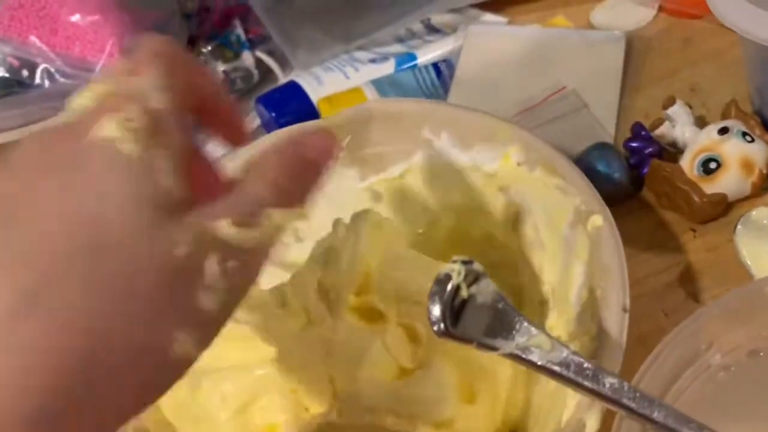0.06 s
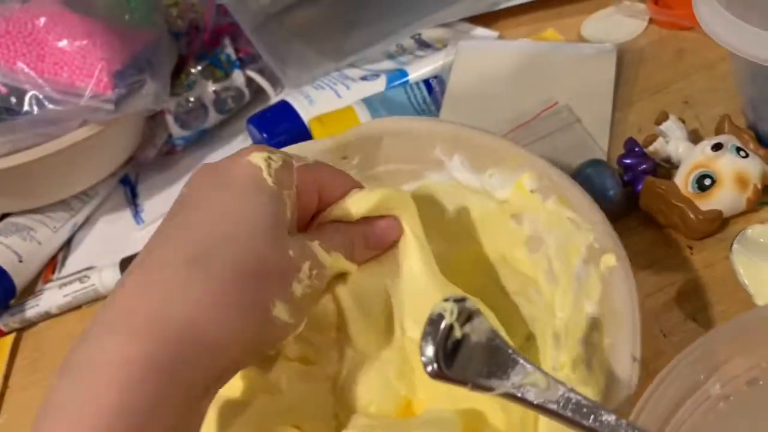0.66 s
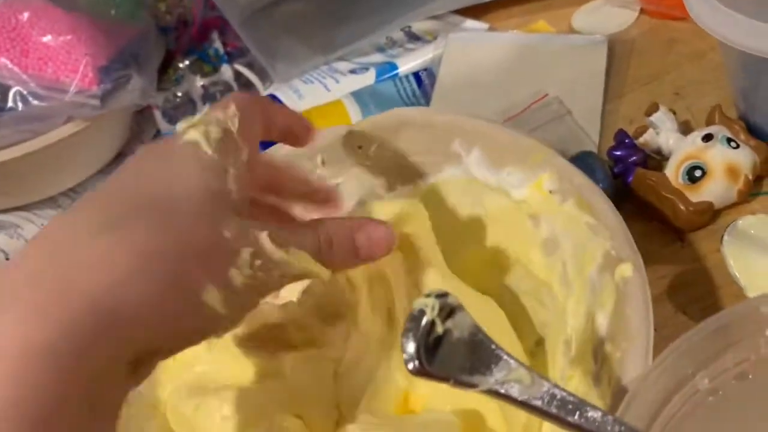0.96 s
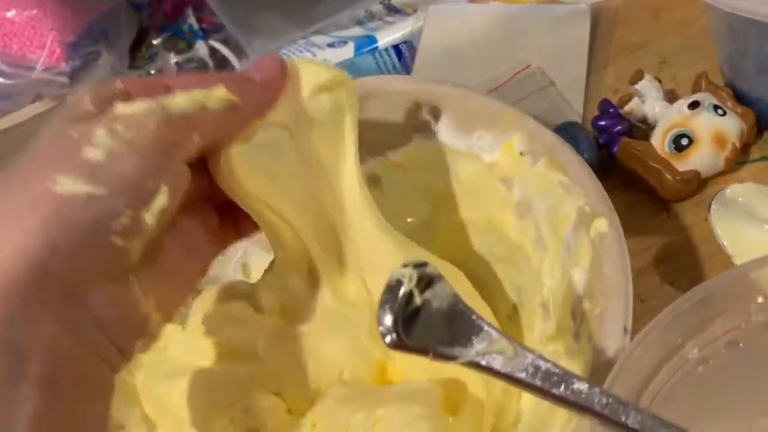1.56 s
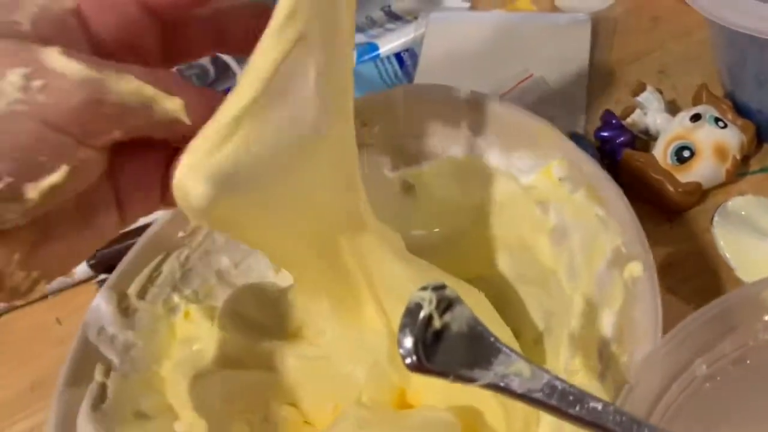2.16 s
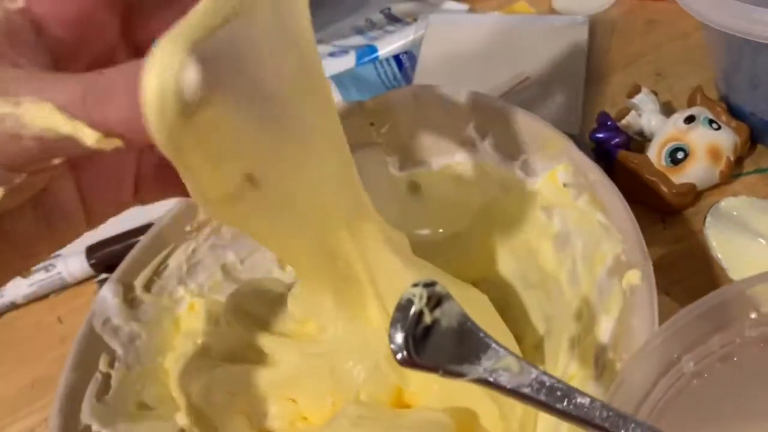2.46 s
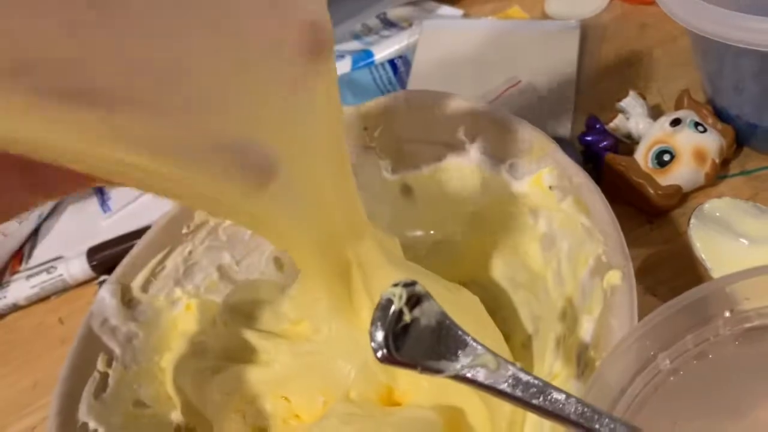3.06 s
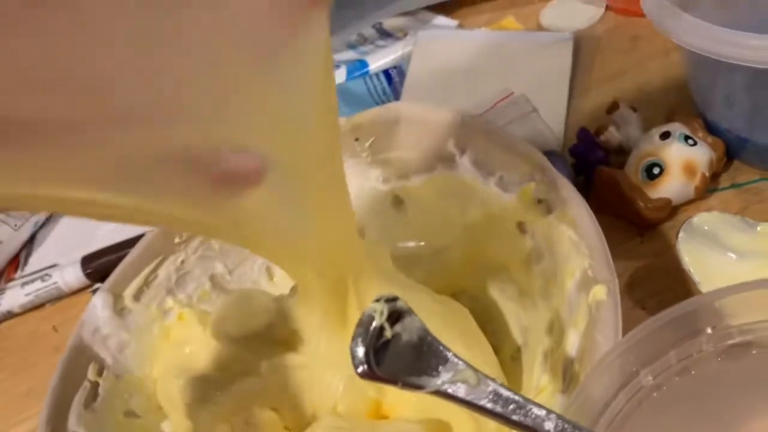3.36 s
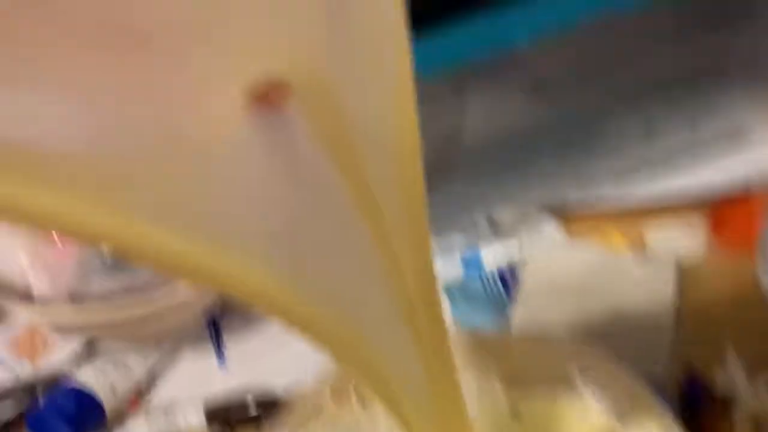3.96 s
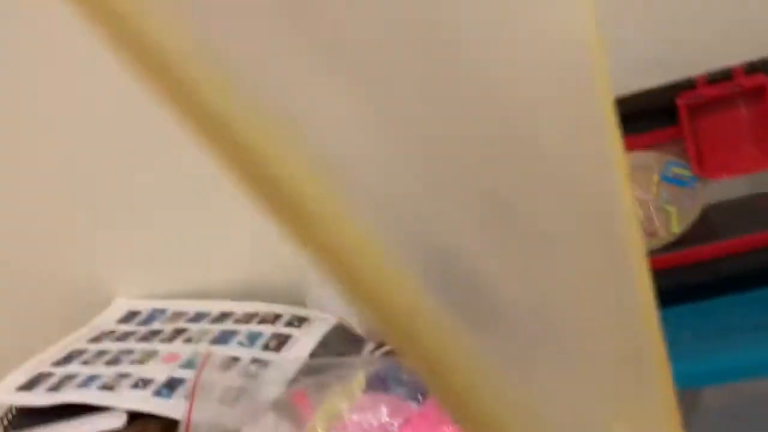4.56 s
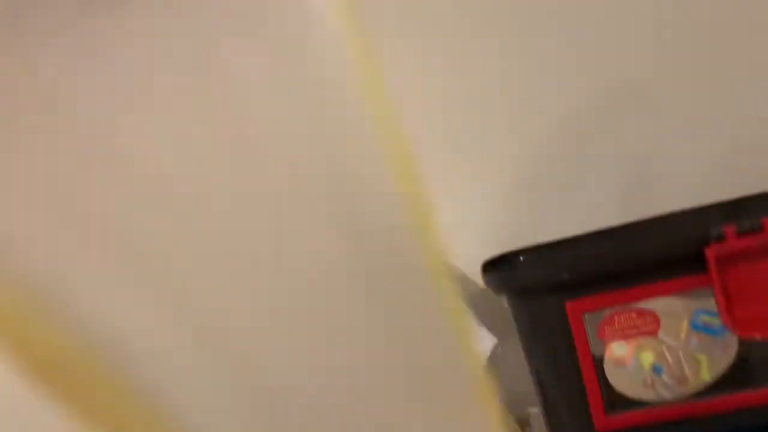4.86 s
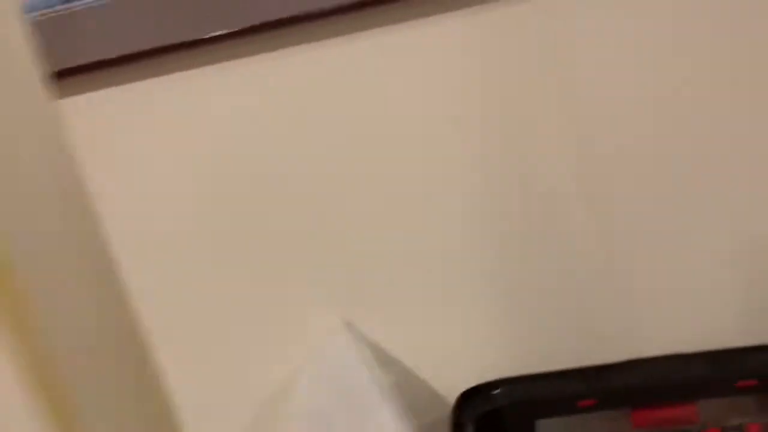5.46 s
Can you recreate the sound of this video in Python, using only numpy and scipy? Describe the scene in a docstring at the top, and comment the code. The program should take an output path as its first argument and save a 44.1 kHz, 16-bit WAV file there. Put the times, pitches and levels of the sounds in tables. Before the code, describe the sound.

Soft, squelchy rubbing and fine crackle sound up close as fingers work fluffy slime in a bowl. After a dull handling thump, sticky threads click apart and air pockets burst in a run of small wet pops. Pulled into a sheet, the slime grows quieter and gives two little snaps. More low microphone bumps follow, then a last brief crackling slide. The room is small and still.

```python
"""Soft, squelchy rubbing, very close: a hand kneads fluffy slime in a plastic bowl.
The foam fizzes against the skin, sticky threads part with dry clicks, folds squeeze out tiny whistles
and trapped air pockets burst in wet pops. Pulled up into a thin, taut sheet, the slime snaps twice.
Dull bumps and rumble come through the body of a hand-held camera; the room is small and quiet."""
import sys
import numpy as np
from scipy import signal
from scipy.fft import rfft, irfft, next_fast_len
from scipy.io import wavfile
from scipy.ndimage import uniform_filter1d, map_coordinates

SR = 44100
rng = np.random.default_rng(int(sys.argv[2]) if len(sys.argv) > 2 else 0)


def int16_out(signal):
    """Quantize to a 16-bit WAV file."""
    q = np.round(np.clip(np.atleast_2d(signal).T, -1, 1) * 32767)
    wavfile.write(sys.argv[1], SR, q.astype(np.int16))


N = 246959

# stereo image: (frequency [Hz], left-right likeness [0-1])
STEREO_LIKENESS = [(60, 0.94), (290, 0.89), (640, 0.44), (1400, 0.24), (3000, 0), (15000, 0)]
# tone of the still air: (frequency [Hz], relative level [dB])
AIR_EQ = [(100, -1), (400, 5.5), (1000, 3.5), (3000, -5), (6000, -4), (10000, 3), (12000, -10.5),
          (15000, -8.5)]
# room decay: (frequency [Hz], t60 [s])
ROOM_DECAY = [(200, 0.054), (1500, 0.2), (5000, 0.099), (12000, 0.11)]
# tone of the reverb: (frequency [Hz], gain [dB])
ROOM_EQ = [(300, -9), (700, -3.5), (1100, 0), (3000, 1.5), (6000, 5.5), (11000, -1)]
# tone of the handling rumble: (frequency [Hz], relative level [dB])
RUMBLE_EQ = [(12, -18.5), (25, -4), (46, 8), (65, 3.5), (100, -3), (165, -11.5), (220, -38.5), (320, -44),
             (600, -54)]
# camera body resonances: (frequency [Hz], width [Hz], gain [dB])
CAMERA_MODES = [(50.8, 36, 0.5), (96.4, 69, 1), (136, 18, -10), (160.2, 5.9, 8), (266, 61, 3)]
# judders of the grip: (time [s], level [dB], length [s], low-pass corner [Hz])
GRIP_BUMPS = [(0.004, -47, 0.02, 130), (0.347, -33, 0.0038, 190), (0.361, -33, 0.058, 280),
              (0.46, -50, 0.11, 112), (1.092, -56.5, 0.043, 99), (1.897, -53.5, 0.033, 55.5),
              (2.817, -53, 0.065, 57), (3.419, -53.5, 0.062, 40.2), (3.871, -33, 0.064, 40.4),
              (4.09, -35.5, 0.011, 134.3), (4.113, -32, 0.0308, 50.7), (4.19, -53.5, 0.22, 29.2),
              (4.441, -41, 0.0583, 36), (5.089, -54.5, 0.039, 65), (5.306, -56.5, 0.059, 63)]
# fader moves of the kneading: (time [s], fizz level [dB], rub level [dB])
KNEAD_FADERS = [(0.0, -69, -63), (0.34, -67, -68), (0.45, -71, -65), (0.62, -72, -73), (0.85, -54.5, -62.5),
                (.95, -61, -57.5), (1.019, -58, -56.5), (1.16, -62.5, -60.5), (1.29, -86.5, -65),
                (1.562, -63, -67), (1.811, -57, -61), (2.139, -68.5, -66.5), (2.261, -75.5, -74),
                (2.56, -81, -73.5), (3.79, -83, -76), (4.069, -75, -76), (4.709, -83.5, -78),
                (5.21, -70.5, -68.5), (5.4, -77.5, -74.5), (5.6, -83, -81)]
# tone of slime rubbing on skin: (frequency [Hz], relative level [dB])
RUB_EQ = [(90, -17.5), (160, 1), (280, -1), (450, -8.5), (700, -17.5), (1400, -33), (4000, -65.5)]
# tone of the foam fizz: (frequency [Hz], relative level [dB])
FOAM_EQ = [(300, -30.5), (600, -9), (1000, -5.5), (1700, -4.5), (2600, -2.5), (4500, -5), (7000, -11.5),
           (9500, -5), (11000, -18.5), (14000, -17)]
# bowl resonances: (frequency [Hz], width [Hz], gain [dB])
BOWL_MODES = [(660, 480, -16), (1054, 260, -2), (1783, 140, -0.5), (2160, 160, -12.5), (2610, 330, -1.5),
              (3050, 300, 3), (4140, 940, -0.5), (5150, 140, -2), (6560, 130, -5), (8980, 600, -0.5),
              (8800, 1800, -1)]
# hollow, body, crack and fizz bands of slides and pops: (low edge [Hz], high edge [Hz])
BANDS = [(280, 800), (800, 2200), (2200, 7000), (7000, 13500)]
# skin slides: (time [s], rise [s], t60 [s], level [dB], tilt [dB/octave], ring pitch [Hz], ring [dB])
SKIN_SLIDES = [(.001, 0.0026, 0.11, -50.5, 1, 291, 32.5), (0.021, 0.0053, 0.064, -55.5, 0.5, 348, 24),
               (0.019, 0.0012, 0.083, -56, -4, 2330, 14), (0.098, 0.028, 0.36, -62, 1, 3700, 4.5),
               (0.304, 0.016, 0.92, -69, -2, 7400, 17.5), (0.362, 0.004, 0.15, -71, -4.5, 400, 15.5),
               (0.798, 0.0025, 0.15, -67.5, -5.5, 1650, 9.5), (0.834, 0.042, 0.075, -63.5, 7, 1570, 13.5),
               (0.89, 0.006, 0.074, -51, 3.5, 1290, 3), (0.921, 0.015, 0.51, -70, -7, 1500, 8.5),
               (0.996, 0.014, 0.16, -53.5, -1, 1470, 3), (1.205, 0.011, 1, -60, -2, 1360, -3.5),
               (1.283, 0.035, 0.32, -65.5, -1, 2220, 16.5), (1.285, 0.027, 0.28, -77.5, 0.5, 7660, 16),
               (1.323, 0.0066, 0.045, -64, -7, 1130, 4), (1.59, 0.041, 1, -55.5, -0.5, 385, 1.5),
               (1.998, 0.00057, 0.093, -58.5, 2, 1250, 24.5), (1.99, 0.0068, 0.36, -70, -8, 2950, 26),
               (2.217, 0.057, 0.22, -64.5, -1.5, 1560, 4), (2.429, 0.032, 0.38, -71, 2, 3750, -3.5),
               (2.722, 0.0095, 0.47, -79.5, 4, 3470, 4), (2.802, 0.0077, 0.085, -62.5, 5, 3620, 1.5),
               (3.09, 0.021, 0.43, -59, 1.3, 3660, 2.5), (3.464, 0.027, 0.15, -73, -3, 543, 16),
               (4.096, 0.0013, 0.17, -63, -1.5, 261, 29), (4.096, 0.002, 0.082, -65, -0.5, 1300, 8),
               (4.206, 0.0044, 0.85, -87, 5, 4300, 12.5), (4.378, 0.027, 0.2, -76, 2.5, 9500, 9),
               (4.72, 0.12, 0.76, -85, -3.5, 2370, 11.5), (4.959, 0.033, 1, -75.5, -6, 1460, 3),
               (5.084, 0.022, 0.45, -57, 0.3, 2700, 5.5), (5.1075, 0.0041, 0.27, -50.5, -0.2, 1180, 3.5),
               (5.1862, 0.0024, 0.21, -59, 0, 3660, 8), (5.199, 0.012, 0.45, -71.5, 0, 5800, 13),
               (5.302, 0.016, 0.21, -64, -2, 544, 3)]
# air squeezed from folds: (time [s], length [s], level [dB], start pitch [Hz], end pitch [Hz])
FOLD_SQUELCHES = [(0.89, .011, -59, 3400, 3420), (0.896, 0.0083, -50.5, 2360, 2260),
                  (.898, 0.0066, -52, 1170, 950), (0.902, 0.0095, -49, 870, 222),
                  (.9095, 0.0053, -54, 1820, 1720), (0.922, 0.01, -62, 1640, 1450)]
# snaps of the taut sheet: (time [s], level [dB])
SHEET_SNAPS = [(3.0173, -51), (3.4357, -34.5)]
# threads parting: (time [s], tick level [dB], tick pitch [Hz], plip level [dB], plip pitch [Hz])
THREAD_CLICKS = [(0.531, -50, 4300, -50, 1500), (0.539, -47, 4540, -45.5, 1980),
                 (.6300, -32, 8700, -45, 1430), (0.647, -41, 8140, -57, 1450),
                 (.9035, -49, 6600, -48, 1500), (1.3271, -72, 4000, -47.5, 1320),
                 (1.995, -42, 2900, -35.5, 434), (2.2066, -37, 1500, -46, 447),
                 (4.0948, -44.5, 4730, -45.5, 1180)]
# air pockets: (time [s], level [dB], tilt [dB/octave], pocket pitch [Hz], ring [dB], skin pitch [Hz])
POCKET_POPS = [(0.301, -62, -4, 6300, 37.5, 7800), (1.5516, -58, 0.5, 990, 12, 2220),
               (1.7022, -38.5, -1, 1680, 10.5, 5400), (1.721, -25.5, 2, 1800, 7, 6660),
               (1.7277, -42.5, 4.5, 1760, 4.5, 9050), (1.749, -34.5, 1.8, 1355, -0.5, 3740),
               (1.7579, -36, -1, 1680, 6, 5900), (1.78, -45.5, 5.5, 1660, 15.5, 8750),
               (1.795, -33, 1, 1920, 10, 3000), (1.822, -32.5, 0.5, 1140, 8, 3230),
               (1.8315, -45.5, 1, 1700, 8.5, 4200), (1.8836, -59.5, -1, 1970, 22, 1210),
               (1.9234, -67, 3, 1150, 18, 8600), (1.9845, -46, 1.5, 2380, 10.5, 3300),
               (1.9946, -39.5, -3, 1240, 8.5, 2840), (2.123, -71, 4.5, 1870, 24.5, 8500),
               (2.205, -46, 4, 1450, 7.5, 2770), (2.5187, -52, 2.5, 2030, -7.5, 9000),
               (4.0894, -55, 4, 1007, 6, 8200), (4.0935, -56, 5, 1150, 9, 4700),
               (4.413, -75.5, 2.5, 9460, 18.5, 9480)]

RING_SHARE = 0.97  # dB of narrow peak per dB of ring
MIRROR_DELAY_S = 0.0054  # a faint time-reversed copy of each pop and click follows after this delay [s]


def amp(db):
    """Decibels to gain."""
    return 10 ** (np.asarray(db) / 20)


def unit(x):
    """Scale to rms 1."""
    return x / np.sqrt(np.mean(x ** 2) + 1e-20)


def along(points, hz):
    """Read a (Hz, value) curve on a log axis."""
    freqs, values = np.transpose(points)
    return np.interp(np.log(hz + 1), np.log(freqs + 1), values)


def fade(t, t60):
    """Exponential decay that loses 60 dB in t60."""
    return np.exp(-np.log(1000) * t / t60)


def filtered(x, response):
    """Apply a complex frequency response."""
    n = x.shape[-1]
    padded = next_fast_len(n + 4096)
    return irfft(rfft(x, padded) * response(np.fft.rfftfreq(padded, 1 / SR)), padded)[..., :n]


def band(x, edges, order=3):
    """Causal band-pass."""
    return signal.sosfilt(signal.butter(order, edges, "bandpass", fs=SR, output="sos"), x)


def resonance(hz, centre, width):
    """One causal resonance, gain 1 at its centre."""
    return 1j * hz * width / (centre ** 2 - hz ** 2 + 1j * hz * width)


def ringing(hz, modes):
    """Response of a ringing object: the sum of its resonances."""
    return sum(amp(db) * resonance(hz, centre, width) for centre, width, db in modes)


def add(track, time, sound):
    """Mix a sound into a track at a time in seconds."""
    start = max(round(time * SR), 0)
    part = sound[..., :N - start]
    track[:, start:start + part.shape[-1]] += part


def spread(pair):
    """Two noises as close-set microphones hear them: centred bass, wide treble."""
    turn = lambda hz: np.arccos(np.clip(along(STEREO_LIKENESS, hz), -1, 1)) / 2
    mid, side = filtered(pair, lambda hz: np.array([np.cos(turn(hz)), np.sin(turn(hz))]))
    return np.array([mid + side, mid - side])


def coloured(pair, eq):
    """Stereo sound of rms 1, shaped by an EQ curve."""
    return unit(filtered(spread(pair), lambda hz: amp(along(eq, hz))))


def band_levels(shape_db, db, tilt, pitch, ring_db, ring_octaves=1.23):
    """Level of each band: a base shape, tilted about 2 kHz and lifted around the ringing pitch."""
    centres = np.sqrt(np.prod(BANDS, axis=1))
    lift = ring_db * np.exp(-(np.log2(centres / pitch) / ring_octaves) ** 2)
    return db + np.array(shape_db) + tilt * np.log2(centres / 2000) + lift


def room_tone(level_db=-81.5):
    """A faint bed of still air."""
    return amp(level_db) * coloured(rng.standard_normal((2, N)), AIR_EQ)


def room_reverb(send, build_s=0.004, clutter_t60=0.05):
    """Things on the table scatter the sound at once, then each frequency dies at its own speed."""
    hz, t, spectrum = signal.stft(rng.standard_normal((2, SR // 2)), SR, nperseg=256)
    decaying = spectrum * fade(t, along(ROOM_DECAY, hz)[:, None])
    tail = spread(signal.istft(decaying, SR, nperseg=256)[1])
    t = np.arange(tail.shape[1]) / SR
    tail = tail * (1 - np.exp(-(t / build_s) ** 2)) * (1 + fade(t, clutter_t60))
    wet = signal.fftconvolve(send, tail / np.linalg.norm(tail[0]), axes=1)[:, :N]
    return filtered(wet, lambda hz: amp(along(ROOM_EQ, hz)))


def handling_rumble(level_db=-66, follow=0.73, settle_db=-6.5, settle_t60=0.58):
    """The camera rumbles more as the hand works harder, and goes on shaking after each bump."""
    t = np.arange(N) / SR
    times, _, rub_db = np.transpose(KNEAD_FADERS)
    work_db = np.interp(t, times, rub_db)
    power = amp(level_db + follow * (work_db - work_db.mean())) ** 2
    for time, db, length, _ in GRIP_BUMPS:
        attack = np.clip((t - time) / length, 0, 1)
        release = fade(np.maximum(t - time - length, 0), settle_t60)
        power += (amp(db + settle_db) * attack * release) ** 2
    return np.sqrt(power) * coloured(rng.standard_normal((2, N)), RUMBLE_EQ)


def grip_bumps(judder_hz=43.3, scatter_s=0.0011, slip_db=2.0, low_hz=24, high_hz=200, firm_share=0.36):
    """A finger judders on the camera; each slip knocks the body, softer contacts more dully."""
    out, t = np.zeros((2, N)), np.arange(SR // 2) / SR
    slips = np.arange(6)
    for time, db, length, soft_hz in GRIP_BUMPS:
        late, strength = rng.standard_normal((2, len(slips)))
        times = slips / judder_hz + scatter_s * np.abs(late)
        sizes = np.clip(length * judder_hz - slips, 0, 1) * amp(slip_db * strength)
        force = np.bincount(np.round(times * SR).astype(int), sizes, len(t))
        body = filtered(force, lambda hz: ringing(hz, CAMERA_MODES) / (1 + 1j * hz / soft_hz) ** 2)
        # a firm contact is too brief to rock the whole body
        low_cut = np.clip(firm_share * soft_hz, low_hz, high_hz / 2)
        knocks = band(body, (low_cut, high_hz))
        add(out, time, amp(db) * knocks / np.sqrt(np.sum(knocks ** 2) / (length * SR)))
    return out


def crackle(size, cells_per_s):
    """Tiny foam cells burst at random over an equal layer of smooth friction."""
    cells = (rng.random((2, size)) < cells_per_s / SR) * rng.standard_normal((2, size))
    return unit(cells) + rng.standard_normal((2, size))


def folds(pair, depth_db):
    """Folds of slime open and close, so narrow resonances come and go."""
    spectrum = signal.stft(pair, nperseg=1024)[2]
    peaks = uniform_filter1d(rng.standard_normal(spectrum.shape[1:]), size=4, axis=0)
    drifting = unit(uniform_filter1d(peaks, size=5, axis=1))
    return signal.istft(spectrum * amp(depth_db * drifting), nperseg=1024)[1][:, :N]


def kneading(trim_db=2, stick_db=2, stick_hz=35):
    """A bed of fizz and rubbing that flutters as the slime sticks and lets go."""
    t = np.arange(N) / SR
    times, *faders = np.transpose(KNEAD_FADERS)
    fizz_gain, rub_gain = [amp(np.interp(t, times, db) + trim_db) for db in faders]
    flutter = map_coordinates(rng.standard_normal(N // 100), [t * stick_hz])
    fizz = coloured(folds(crackle(N, cells_per_s=4000), depth_db=2.8), FOAM_EQ)
    rub = coloured(folds(rng.standard_normal((2, N)), depth_db=4.2), RUB_EQ)
    return unit(amp(stick_db * flutter)) * (fizz_gain * fizz + rub_gain * rub)


def skin_slides(shape_db=(-5, 0, 0.74, -2.5), direct=4, sing_db=7, sing_q=7, sing_t60=0.35):
    """Skin slips over foam: a swell of fine crackle, singing at first in a narrow air gap."""
    out, t = np.zeros((2, N)), np.arange(SR // 3) / SR
    for time, rise, t60, level_db, tilt, pitch, ring_db in SKIN_SLIDES:
        grain = spread(crackle(len(t), cells_per_s=1800))
        grain = filtered(grain, lambda hz: direct + ringing(hz, BOWL_MODES))
        singing = filtered(grain, lambda hz: resonance(hz, pitch, pitch / sing_q))
        grain += amp(sing_db + RING_SHARE * ring_db) * fade(t, sing_t60) * singing
        swell = np.minimum(t / rise, 1) * fade(np.maximum(t - rise, 0), t60)
        for edges, db in zip(BANDS, band_levels(shape_db, level_db, tilt, pitch, ring_db)):
            add(out, time, amp(db) * unit(swell * band(grain, edges)) * np.sqrt(np.mean(swell ** 2)))
    return out


def fold_squelches(rough=0.48, flutter_hz=450):
    """Air escapes a fold through tiny gaps: short fluttering whistles, most sinking in pitch."""
    out = np.zeros((2, N))
    for time, length, db, start_hz, end_hz in FOLD_SQUELCHES:
        t = np.arange(int(length * SR)) / SR
        progress = t / length
        flutter, waver = [map_coordinates(knots, [t * flutter_hz], mode="wrap")
                          for knots in rng.standard_normal((2, SR // 100))]
        pitch = start_hz + (end_hz - start_hz) * progress
        whistle = np.sin(2 * np.pi * np.cumsum(pitch) / SR + rough * waver) * (1 + rough * flutter)
        add(out, time, amp(db) * unit(whistle * np.sin(np.pi * progress)))
    return out


def sheet_snaps(sweep_s=0.00008, cycles=1.05, hold_s=0.0042, t60=0.026, left_db=5, dull_hz=9000):
    """A flexing wave runs along the taut sheet, treble first, so each snap dives in pitch."""
    out, t = np.zeros((2, N)), np.arange(SR // 16) / SR
    dive = np.sin(2 * np.pi * cycles * np.log1p(t / sweep_s))
    envelope = (1 + t / hold_s) ** -0.45 * fade(t, t60)
    snap = filtered(dive * envelope, lambda hz: 1 / (1 + 1j * hz / dull_hz))
    for time, db in SHEET_SNAPS:
        add(out, time, amp([[db + left_db / 2], [db - left_db / 2]]) * snap)
    return out


def thread_clicks(tick_s=0.00032, width=1.38, plip_delay_s=0.00053, cycles=1.8, sag=0.2, mirror_db=-20):
    """A sticky thread parts with a dry tick; the hollow it leaves gives a short, sinking plip."""
    out, t = np.zeros((2, N)), np.arange(SR // 40) / SR
    opening = (t / tick_s * np.exp(1 - t / tick_s)) ** 2
    for time, tick_db, tick_hz, plip_db, plip_hz in THREAD_CLICKS:
        noise = spread(rng.standard_normal((2, len(t)))) + rng.standard_normal(len(t))
        tear = band(noise, (tick_hz / width, tick_hz * width), order=2)
        tick = unit(tear * opening) * np.sqrt(np.mean(opening ** 2))
        age = np.maximum(t - plip_delay_s, 0) * plip_hz / cycles
        pitch = plip_hz * (1 - sag * (1 - np.exp(-age))) * (age > 0)
        plip = np.sin(2 * np.pi * np.cumsum(pitch) / SR) * 2 * age * np.exp(1 - 2 * age)
        click = amp(tick_db) * tick + amp(plip_db) * plip
        add(out, time, click)
        add(out, time + MIRROR_DELAY_S, amp(mirror_db) * click[::-1])
    return out


def pocket_pops(direct=0.3, pocket_q=5, skin_db=8, skin_q=7, spray_db=-6, mirror_db=-22):
    """A pocket bursts with a wet spray; its hollow, its skin and the bowl ring."""
    shape_db, left_db = (-10, -2, -2, -5.5), (-1, 1.5, -2, -8)  # per band; the fizz beams to the right
    middling_db, hollow_growth, near_drying = -42, 0.64, 0.15
    lead_s, swell_s, halo_s, halo_db = 0.01, 0.0016, 0.004, -22
    spray_hz, head = (11500, 14900), SR // 66
    mic_delays_s = np.array([[0], [0.00016]])  # left microphone first
    lags_s = np.linspace(0.00027, 0, len(BANDS))  # the tear widens, so the treble comes first
    out, reverb_send = np.zeros((2, 2, N))
    t = np.arange(SR // 14) / SR - lead_s
    halo = amp(halo_db) * np.exp(-np.abs(t) / halo_s)

    def burst(lag):
        """A fast swell over a faint, brief halo of noise."""
        age = np.maximum(t - lag, 0) / swell_s
        return (age * np.exp(1 - age)) ** 3 + halo

    def levelled(part):
        """Normalise each channel by the energy of its attack."""
        return part / np.sqrt(np.sum(part[:, :head] ** 2, axis=1, keepdims=True) / (head - lead_s * SR))

    for time, level_db, tilt, pitch, ring_db, skin_hz in POCKET_POPS:
        size_db = level_db - middling_db
        levels = band_levels(shape_db, level_db, tilt, pitch, ring_db)
        levels[0] += hollow_growth * size_db  # bigger pockets are hollower
        tear = rng.standard_normal(len(t)) + spread(rng.standard_normal((2, len(t))))

        def path(hz):
            """Through pocket, skin and bowl to the microphones."""
            pocket = 1 + amp(RING_SHARE * ring_db) * resonance(hz, pitch, pitch / pocket_q)
            skin = 1 + amp(skin_db) * resonance(hz, skin_hz, skin_hz / skin_q)
            bowl = direct + ringing(hz, BOWL_MODES)
            return pocket * skin * bowl * np.exp(-2j * np.pi * hz * mic_delays_s)

        pop = amp(levels[-1] + spray_db) * levelled(band(tear * burst(0), spray_hz))
        for edges, db, lag, pan in zip(BANDS, levels, lags_s, left_db):
            layer = band(filtered(tear * burst(lag), path), edges)
            pop += amp([[db + pan / 2], [db - pan / 2]]) * levelled(layer)
        start = time - lead_s
        add(out, start, pop)
        add(out, start + MIRROR_DELAY_S, amp(mirror_db) * pop[::-1])
        add(reverb_send, start, amp(-near_drying * max(size_db, 0)) * pop)  # louder is nearer, so drier
    return out, reverb_send


def scene(pop_send_db=-10.5, click_send_db=-18):
    """Slime and handling over the room tone; only pops and clicks feed the reverb."""
    pops, pop_send = pocket_pops()
    clicks = thread_clicks()
    air = room_tone()
    reverb = room_reverb(amp(pop_send_db) * pop_send + amp(click_send_db) * clicks)
    accents = pops + clicks + sheet_snaps() + fold_squelches() + skin_slides()
    return air + reverb + accents + grip_bumps() + kneading() + handling_rumble()


def record(dry, hiss_db=-84.5, top_hz=15500):
    """The top octave is dulled, with a dip near 12 kHz; faint hiss is added, all above top_hz cut."""
    treble_eq = [(20, 3.5), (10700, -4.5), (12000, -16), (14200, -12.0), (15400, -22.5)]  # (Hz, dB)
    hiss = amp(hiss_db) * band(rng.standard_normal((2, N)), (8500, 14500), order=8)
    heard = filtered(dry, lambda hz: amp(along(treble_eq, hz))) + hiss
    return filtered(heard, lambda hz: hz < top_hz)


dry = scene()
out = record(dry)
int16_out(out)
```